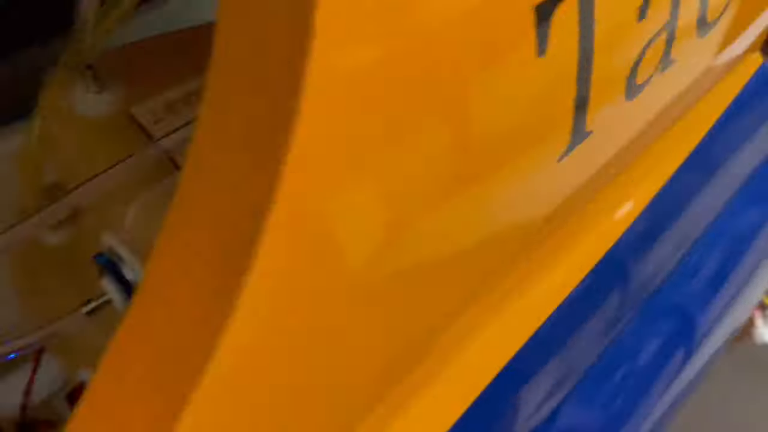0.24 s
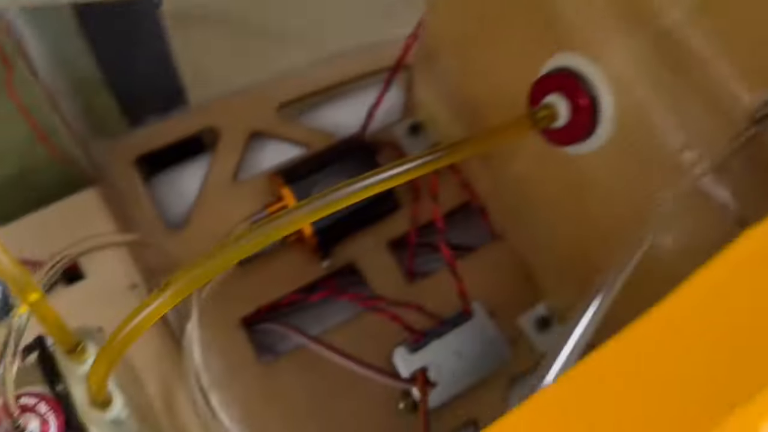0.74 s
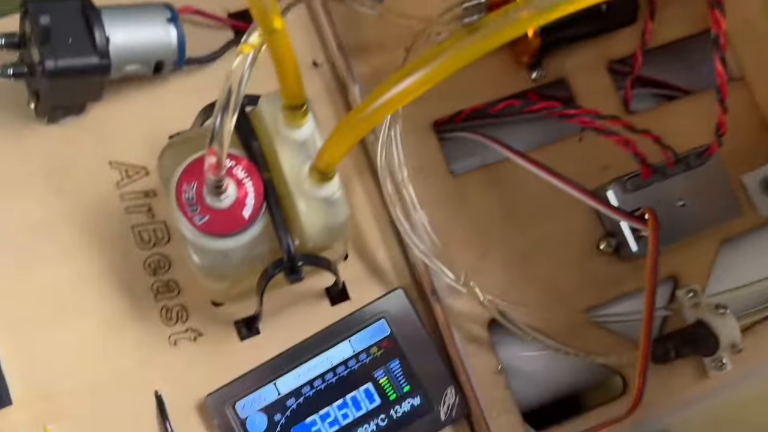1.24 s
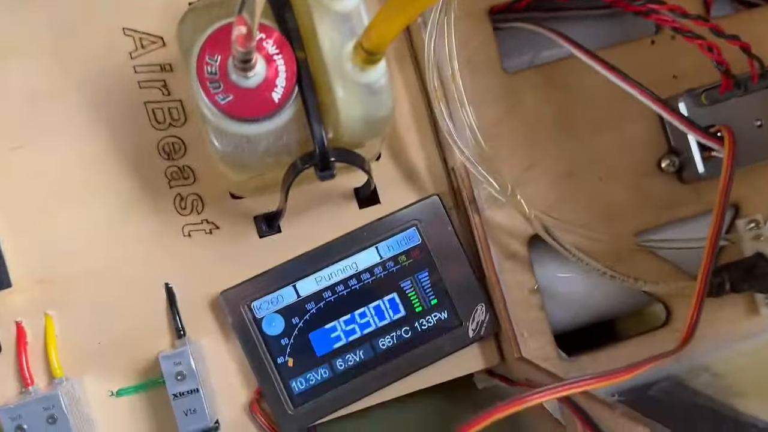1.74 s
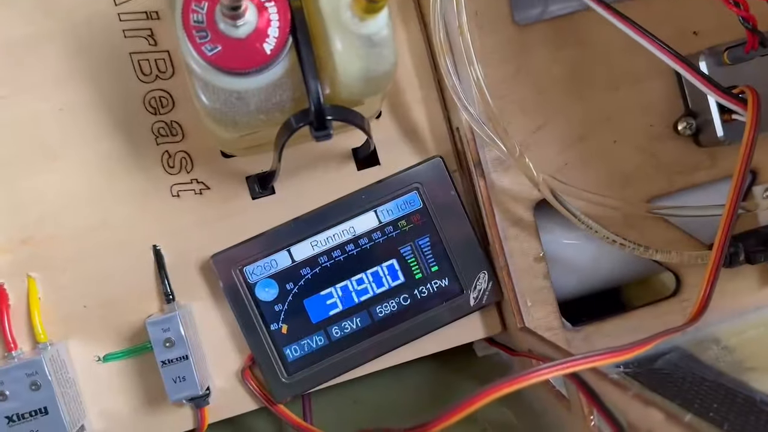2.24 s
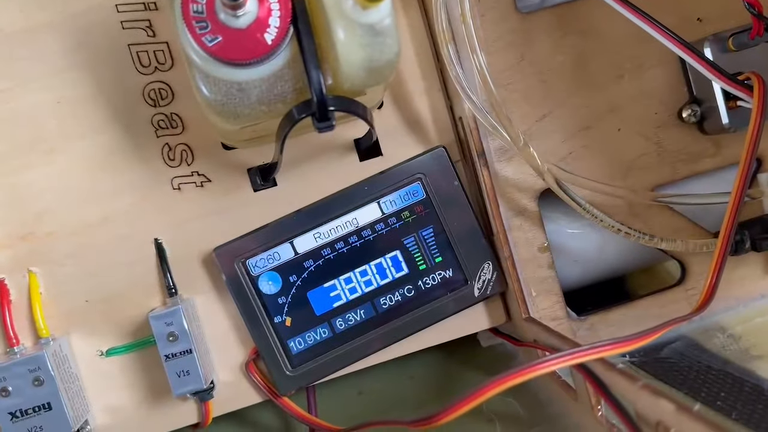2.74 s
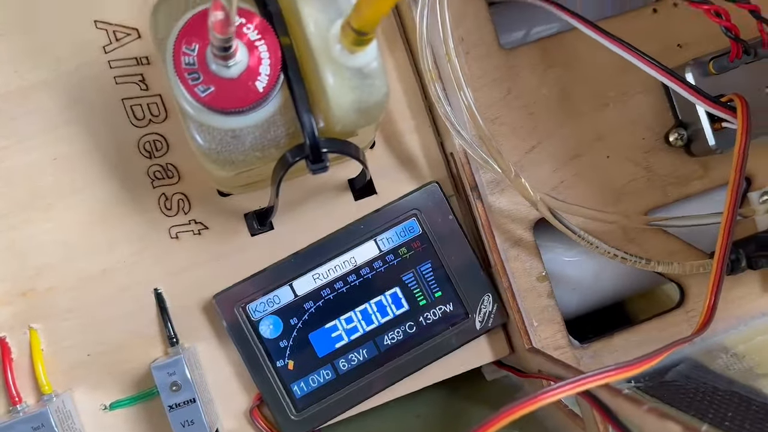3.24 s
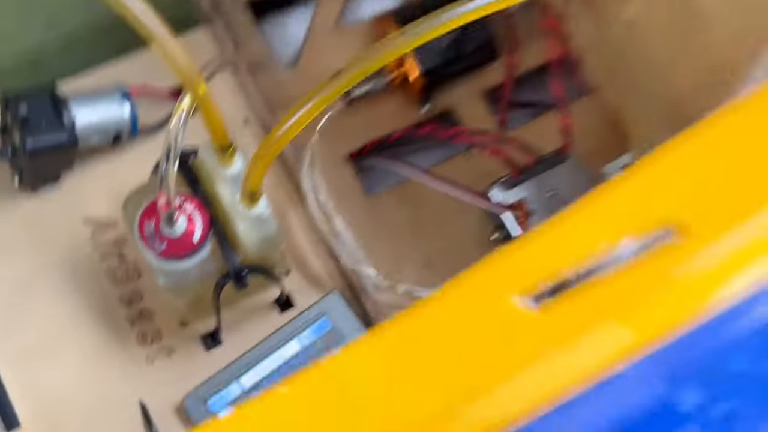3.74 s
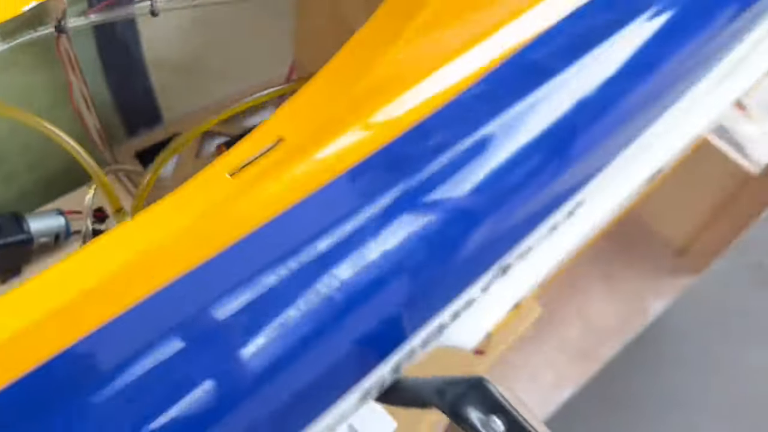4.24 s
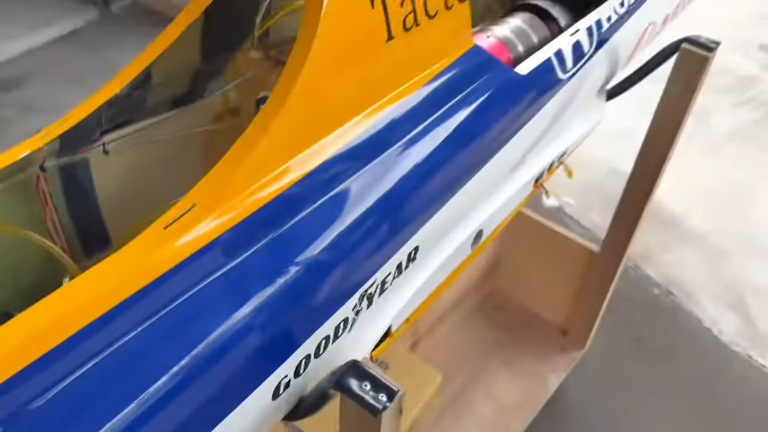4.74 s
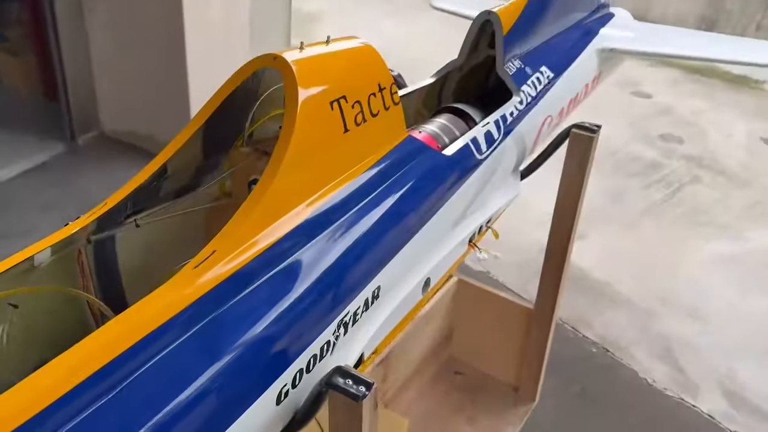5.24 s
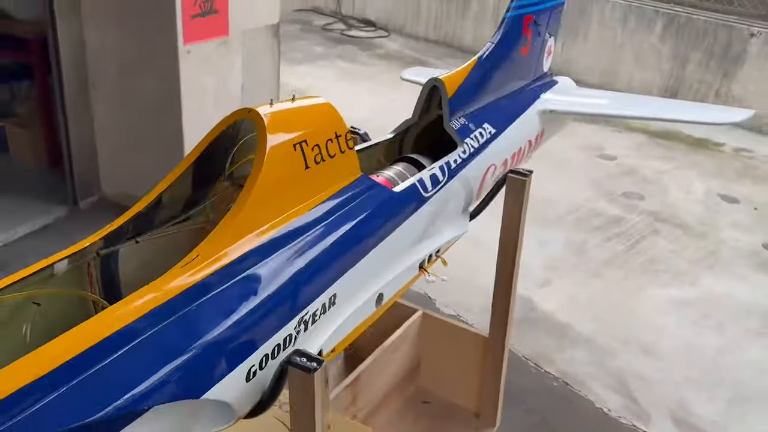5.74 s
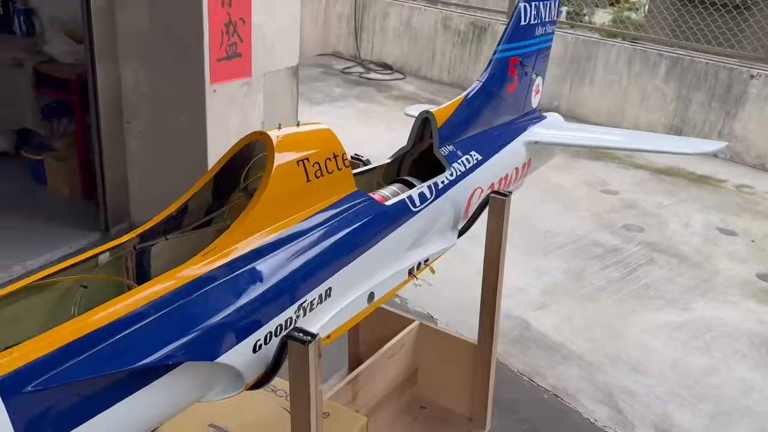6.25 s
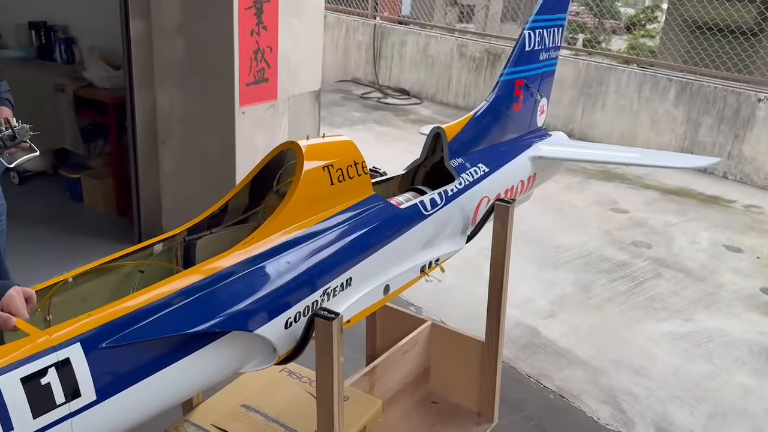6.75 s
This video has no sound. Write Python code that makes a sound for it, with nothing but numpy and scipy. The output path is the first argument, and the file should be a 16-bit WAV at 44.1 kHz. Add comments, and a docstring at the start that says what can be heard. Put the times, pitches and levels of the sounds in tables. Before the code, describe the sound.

Very high compressor whine climbs and levels off above jet hiss and rumble, wavering, with soft thumps, then fades as the listener backs away.

```python
"""Small jet turbine spooling up

A small jet turbine in a model aircraft spools up and settles at idle, heard by a hand-held phone that backs away.
The compressor (7 full, 7 splitter blades) whines on multiples of shaft speed, nicked by a sliding echo.
Filtered noise makes the jet, intake hiss, blade fizz, combustion roar and wash buffeting the ports;
decaying sines make low thumps, and a faint whistle, mostly falling, comes through in spells."""
import sys
import numpy as np
from scipy import signal
from scipy.fft import rfft, irfft, next_fast_len
from scipy.io import wavfile
from scipy.ndimage import uniform_filter1d, map_coordinates

SR = 44100
rng = np.random.default_rng(int(sys.argv[2]) if len(sys.argv) > 2 else 0)


def wav_out(sig):
    """Save sig, one row per channel (or a flat mono array), as 16-bit PCM at SR to the path in sys.argv[1]."""
    wavfile.write(sys.argv[1], SR, np.round(np.clip(np.atleast_2d(sig).T, -1, 1) * 32767).astype(np.int16))


N = 307818
TOP_HZ = 15900  # band limit of the phone

# Phone position: time_s, place (0 by the engine, 1 leaning over, 2 in the open bay,
# 3 over the rim, 4 beside the fuselage, 5 a step back)
PLACE = [(0, 0), (.32, 0), (.42, 1), (1.08, 1), (1.2, 2), (3.75, 2), (3.85, 3), (4.2, 3), (4.3, 4),
         (4.9, 4), (5.65, 4.3), (6.0, 5), (7, 5)]
# The two microphone ports: freq_hz, likeness (0-1), left_lead_rad
PORTS = [(100, .85, .1), (300, .96, -.2), (600, .68, -1), (1000, .4, -1), (1500, .58, -.9), (2200, .65, .1),
         (3100, .52, .8), (4500, .35, .8), (6000, .4, 0), (6800, .4, 1.3), (7500, .75, 2.9),
         (8200, .98, 3.1), (11000, .97, 3.1), (11800, .6, 2.3), (12500, .5, 1.9), (14000, .52, 1.2),
         (15300, .7, .5)]


def amp(db):
    """dB to gain."""
    return 10 ** (np.asarray(db) / 20)


def unit(x):
    """Scaled to rms 1."""
    return x / np.sqrt(np.mean(x ** 2) + 1e-20)


def along(freq_hz, values, hz):
    """Values given at freq_hz, interpolated at hz on a log axis."""
    return np.interp(np.log(hz + 1), np.log(np.asarray(freq_hz) + 1), values)


def track(time_s, values):
    """Breakpoints to one value per sample."""
    return np.interp(np.arange(N) / SR, time_s, values)


def wobble(knots_per_s):
    """Smooth random curve through normally distributed knots."""
    knots = rng.standard_normal(int(N * knots_per_s / SR) + 4)
    return map_coordinates(knots, [np.arange(N) * knots_per_s / SR])


def filtered(x, response):
    """x times a complex response of frequency."""
    size = next_fast_len(N + SR // 2)
    spectrum = rfft(x, size) * response(np.fft.rfftfreq(size, 1 / SR))
    return irfft(spectrum, size)[..., :N]


def shaped(points):
    """Gain function of a (freq_hz, density_db) spectrum."""
    return lambda hz: amp(along(*np.transpose(points), hz))


def hollow(modes):
    """Gain function of resonances (centre, width, dB), each applied twice for steep skirts."""
    def gain(f):
        power = 0
        for centre, width, db in modes:
            resonance = f * width / (centre * centre - f * f + 1j * f * width)
            power = power + amp(2 * db) * np.abs(resonance) ** 4
        return np.sqrt(power)
    return gain


def rush(gain, patchy_db):
    """Noise of rms 1 at two partly alike ports, with long, narrow time-frequency patches of random gain."""
    grid = signal.stft(rng.standard_normal((2, N)), nperseg=512)[2]
    field = uniform_filter1d(rng.standard_normal(grid.shape[1:]), size=2, axis=0)
    field = uniform_filter1d(field, size=30, axis=1)
    pair = signal.istft(grid * amp(patchy_db * unit(field)), nperseg=512)[1][:, :N]
    freq_hz, likeness, lead_rad = np.transpose(PORTS)

    def mix(hz):
        angle = np.arccos(np.clip(along(freq_hz, likeness, hz), 0, 1)) / 2
        return gain(hz) * [np.cos(angle), np.sin(angle)]

    def shift(hz):
        return np.exp(.5j * np.outer([1, -1], along(freq_hz, lead_rad, hz)))

    same, apart = filtered(pair, mix)
    return unit(filtered(np.array([same + apart, same - apart]), shift))


def tone(hz, gain, flicker_db, lead_rad=None):
    """Sine of rms gain at both ports, its level and phase flickering at random."""
    if lead_rad is None:
        lead_rad = along(*np.transpose(PORTS)[::2], hz)
    flicker = flicker_db * (wobble(60) + .8 * np.array([wobble(70), wobble(70)]))
    tremble_rad = 0.11 * flicker_db * (wobble(65) + np.array([wobble(55), wobble(50)]))
    phase = 2 * np.pi * np.cumsum(hz) / SR + [[.5], [-.5]] * lead_rad + tremble_rad
    return np.sqrt(2) * amp(flicker) * np.imag(gain * np.exp(1j * phase))


def scattered(share):
    """Complex gain at both ports of direct sound plus many weak, slowly rearranging reflections."""
    per_s = 9
    shared = wobble(per_s) + 1j * wobble(per_s)
    own = np.array([wobble(per_s) + 1j * wobble(per_s) for port in range(2)])
    return (1 + share * (shared + .5 * own)) / np.sqrt(1 + 2 * share ** 2)


def thumps():
    """Air thumps on the ports: short swells of a sine that sags in pitch."""
    # onset_s (swell starts 5 ms earlier), peak_db, start_hz, phase_sag_per_s, rise_s
    thump_list = [(1.641, -17.5, 225, 3, 0.0074), (1.662, -21, 297, 0.5, 0.01),
                  (1.724, -24, 229, 3.3, .006), (2.0, -17.5, 235, 9.7, .007),
                  (2.016, -25, 100, 8.6, 0.0091), (2.3, -22.5, 188, 4.5, 0.0064),
                  (2.785, -31.5, 374, .3, 0.014), (2.922, -29.5, 284, 0.3, 0.025),
                  (3.19, -30, 392, .3, .016), (3.595, -30, 220, 15, 0.0065), (4.32, -34, 190, 1, 0.021),
                  (5.934, -37, 95, 6, 0.0062)]
    out, t = np.zeros(N + SR), np.arange(SR // 5) / SR
    for onset_s, peak_db, start_hz, sag_per_s, rise_s in thump_list:
        swell = (t / rise_s) ** 2 * np.exp(2 - 2 * t / rise_s)
        cycles = start_hz * t / (1 + sag_per_s * t)
        first = round((onset_s - .005) * SR)
        out[first:][:len(t)] += amp(peak_db) * swell * np.sin(2 * np.pi * cycles)
    return out[:N]


def roar():
    """Combustion noise rung by fuselage hollows, coloured by place, over lumpy low-frequency wash buffeting."""
    # combustion roar before gust lift: time_s, level_db
    roar_level = [(0, -26.5), (0.68, -28.5), (1.3, -30.5), (1.5, -31), (1.65, -28), (1.77, -30),
                  (1.83, -34), (1.95, -32.5), (2.35, -31.5), (2.5, -34), (2.8, -34), (2.84, -43.5),
                  (3.05, -42.5), (3.18, -38), (3.3, -34.5), (3.55, -36.5), (3.73, -37), (3.79, -44.5),
                  (4.0, -45), (4.06, -40.5), (4.33, -40.5), (4.58, -39.5), (4.7, -41), (5.25, -41.5),
                  (5.5, -42.5), (6.5, -41.5), (6.99, -40.5)]
    # steady buffeting: time_s, level_db
    wash_level = [(0, -42), (.5, -42), (.8, -42), (1.2, -47), (1.9, -46.5), (2.4, -48), (2.8, -55),
                  (3.0, -59), (3.87, -59), (3.94, -72), (4.1, -60), (5.0, -63), (6.1, -60), (7, -64)]
    # gusts of exhaust wash: centre_s, peak_db, length_s
    gusts = [(0.657, -41, 0.16), (1.145, -42.5, 0.37), (1.4, -36, 0.062), (1.614, -37, 0.17),
             (2.022, -32, 0.051), (2.32, -40.5, 0.12), (2.685, -51.5, 0.21), (2.95, -50, 0.037),
             (3.39, -54, 0.058), (3.65, -51, 0.07), (3.868, -55, 0.056), (2.6, -56, 0.48), (5.8, -62, 0.4),
             (5.96, -53, .08), (6.39, -56, 0.047), (6.585, -58, 0.05), (6.912, -61, 0.052)]
    # buffeting spectrum: freq_hz, relative density_db
    buffet_spectrum = [(15, -34), (30, -15), (60, -4.5), (100, -0.5), (140, -2.5), (250, -35.5)]
    # fuselage hollows: centre_hz, width_hz of one pass, relative level_db at places 0 to 5
    hollows = [(176, 75, -5.5, -7, -1, -1, -1, -4), (217, 74, -0.5, 0.5, -7.5, -7.5, -13, -0.5),
               (290.5, 78, -15, -10.5, 2, 1, 1, -2), (388, 97, -13, -8, -3.5, -10, -17, -2),
               (452, 70, -8.5, -14, -18, -10.5, -8, 1.5), (494.5, 67, -2, -8.5, -10, -15, -9.5, -12),
               (615, 168, -5.5, -16, -8.5, -12.5, -14, -9), (723, 187, -18, -13, -14.5, -14, -9.5, -9.5),
               (867, 71, -11.5, -12, -17.5, -4, -1, -4.5), (1097, 82, -16.5, -15.5, -20.5, -7, -14.5, -15),
               (1327, 45, -24, -28, -17.5, -19, -9, -9.5), (1843, 97, -17, -19, -15, -11, -18, -10.5),
               (3017, 160, -28, -25, -15.5, -6, -19.5, -18.5)]
    roar_db_per_gust_db = 0.076  # gust dB over the steady buffeting

    t = np.arange(N) / SR
    steady = amp(track(*np.transpose(wash_level)))
    buffet = steady.copy()
    for centre_s, peak_db, length_s in gusts:
        buffet += amp(peak_db) * np.exp(-2 * ((t - centre_s) / length_s) ** 2)

    place = track(*np.transpose(PLACE))
    centre_hz, width_hz, *levels_db = np.transpose(hollows)
    body = 0
    for k, level_db in enumerate(levels_db):
        nearness = np.sqrt(np.clip(1 - abs(place - k), 0, 1))
        modes = list(zip(centre_hz, width_hz, level_db))
        body = body + nearness * rush(hollow(modes), patchy_db=0.2)
    body = body * amp([[.8], [-.8]] + 1.02 * wobble(14)) * (buffet / steady) ** roar_db_per_gust_db
    lumps = amp(0.97 * wobble(10)) * rush(shaped(buffet_spectrum), patchy_db=3.0)
    return amp(track(*np.transpose(roar_level))) * body + buffet * unit(lumps)


def airflow():
    """Jet, intake hiss and blade fizz as shaped noise; the jet crossfades to a duller one outside the bay."""
    # time_s, jet_db, hiss_db, fizz_db
    air_levels = [(0.0, -31.5, -38, -46), (0.6, -30.5, -27.5, -35), (1.55, -31, -25.5, -31.5),
                  (1.8, -34.5, -32, -35), (2.16, -35.5, -32.5, -36), (2.26, -35.5, -35, -38),
                  (2.36, -35.5, -47, -50), (2.9, -36.5, -45, -48), (3.02, -36, -35.5, -39),
                  (3.57, -38.5, -36.5, -38), (3.66, -38.5, -40, -47), (3.84, -39.5, -41, -48),
                  (3.92, -40, -38, -36.5), (4.4, -44.5, -46, -41.5), (5.39, -45.5, -45.5, -46.5),
                  (6.13, -45.5, -48, -47), (6.99, -46, -50, -48)]
    # spectra: freq_hz, relative density_db
    near_jet_spectrum = [(500, -32), (950, -10.5), (1300, -4), (1900, -8), (2400, -8.5), (3000, -7.5),
                         (3400, -5), (4200, -1.5), (5500, -1.5), (6500, 0.5), (8000, -13)]
    far_jet_spectrum = [(500, -53), (1000, -1.5), (1230, -4), (1600, -2.5), (2050, -3.5), (2400, -5),
                        (3000, -4.5), (3400, -6), (4400, -6), (5500, -4.5), (6500, -6.5), (8000, -24)]
    hiss_spectrum = [(4500, -40), (5800, -7), (7000, -3), (8500, 0), (10000, -3), (11700, -7), (13500, -40)]
    fizz_spectrum = [(10500, -65), (11800, 0), (13000, 12.5), (14500, 4), (15700, 4.5)]

    time_s, jet_db, hiss_db, fizz_db = np.transpose(air_levels)
    outside = np.clip(track(*np.transpose(PLACE)) / 4, 0, 1)
    near = np.sqrt(1 - outside) * rush(shaped(near_jet_spectrum), patchy_db=3.5)
    far = np.sqrt(outside) * rush(shaped(far_jet_spectrum), patchy_db=1.8)
    jet = (near + far) * amp(track(time_s, jet_db) + .4 * wobble(6) + [[-.4], [.4]])
    hiss = amp(track(time_s, hiss_db) + wobble(8)) * rush(shaped(hiss_spectrum), patchy_db=1.5)
    fizz = amp(track(time_s, fizz_db) + wobble(9)) * rush(shaped(fizz_spectrum), patchy_db=2)
    return jet + hiss + fizz


def whistle():
    """Thin, mostly falling tone in spells, probably the starter motor coasting."""
    # time_s, pitch_hz
    pitch = [(2.15, 3080), (2.24, 2960), (2.434, 2694), (2.65, 2523), (3.0, 2398), (3.32, 2305),
             (3.69, 2204), (3.78, 2180), (3.9, 2222)]
    # spells in which it comes through: start_s, end_s, level_db
    spells = [(2.2, 2.26, -51), (2.3, 2.93, -45.5), (2.96, 3.05, -51), (3.3, 3.37, -52), (3.645, 3.69, -45),
              (3.785, 3.85, -48.5)]
    edge_db_per_s = 500
    t = np.arange(N) / SR
    gain = 0
    for start_s, end_s, level_db in spells:
        outside_s = np.maximum(0, np.maximum(start_s - t, t - end_s))
        gain = gain + amp(level_db - edge_db_per_s * outside_s)
    return tone(track(*np.transpose(pitch)), gain * amp([[1.2], [-1.2]]), flicker_db=1.8)


def sliding_echo():
    """Echo lag (cycles of the whine) and strength, sliding as pitch and phone move."""
    # time_s, lag_cycles, strength (0-1)
    echo_points = [(0.0, 0.0, 0.0), (0.036, 0.5, 0.48), (0.086, 1.5, 0.97), (0.167, 2.5, 0.02),
                   (0.244, 3.5, 0.42), (0.344, 4.5, 0.34), (0.393, 5.5, 0.41), (0.478, 6.5, 0.51),
                   (0.562, 7.5, 0.25), (0.649, 8.5, 0.85), (0.761, 9.5, 0.19), (0.856, 10.5, 0.51),
                   (1.021, 11.5, 0.0), (1.161, 12.5, 0.82), (1.204, 13.5, 0.54), (1.303, 14.5, 0.72),
                   (1.438, 15.5, 0.53), (1.499, 16.5, 0.33), (1.598, 17.5, 0.53), (1.774, 18.5, 0.37),
                   (1.952, 19.5, 0.24), (2.013, 20.5, 0.26), (2.203, 21.5, 0.13), (2.263, 21.95, 0.23),
                   (3.398, 22.05, 0.97), (3.462, 22.5, 0.85), (3.569, 23.5, 0.26), (3.639, 23.95, 0.15),
                   (3.879, 24.05, 0.66), (3.944, 24.5, 0.58), (4.119, 25.5, 0.01), (4.173, 26.5, 0.4),
                   (4.213, 27.5, 0.72), (4.303, 28.5, 0.24), (4.363, 28.95, 0.97), (4.662, 29.05, 0.82),
                   (4.734, 29.5, 0.48), (4.804, 29.95, 0.97), (4.923, 30.05, 0.0), (4.996, 30.5, 0.56),
                   (5.125, 31.5, 0.34), (5.275, 32.5, 0.03), (5.437, 33.5, 0.28), (5.577, 34.5, 0.78),
                   (5.732, 35.5, 0.48), (5.775, 35.95, 0.72), (5.901, 36.05, 0.0), (5.952, 36.5, 0.69),
                   (5.997, 37.5, 0.55), (6.098, 38.5, 0.23), (6.199, 39.5, 0.37), (6.244, 39.95, 0.0),
                   (6.328, 40.05, 0.97), (6.395, 40.5, 0.44), (6.518, 41.5, 0.8), (6.631, 42.5, 0.4),
                   (6.699, 43.5, 0.3), (6.828, 44.5, 0.29), (6.98, 45.0, 0.0)]
    time_s, lag_cycles, strength = np.transpose(echo_points)
    return track(time_s, lag_cycles), track(time_s, strength)


def whine(shaft_hz, lag_cycles, strength, moving):
    """Passing tone of all 14 blades, cancelled by the echo near half-cycle lags, plus haze and neighbours."""
    # crests of the tone: time_s, left_db, right_db, left_lead_rad, left_extra_lag_cycles (echo)
    crests = [(0.0, -26.7, -15.9, 6.41, -0.06), (0.122, -24.8, -22.9, 1.07, 0.05),
              (0.2, -17.7, -16.8, 0.47, -0.09), (0.294, -17.3, -18.7, 0.31, 0.14),
              (0.372, -18.2, -29.3, -0.57, -0.1), (0.437, -18.3, -17.8, -2.11, -0.15),
              (0.519, -20.6, -13.6, 0.71, -0.15), (0.609, -17.9, -12.9, 1.96, 0.13),
              (0.713, -14.2, -12.9, 1.21, -0.04), (0.821, -22.9, -23.4, 1.69, -0.02),
              (0.95, -15.5, -43.3, 3.4, -0.15), (1.095, -19.3, -13.5, 3.0, -0.12),
              (1.18, -19.1, -21.6, 3.91, 0.15), (1.252, -12.9, -21.7, 3.98, 0.15),
              (1.367, -10.3, -11.4, 3.01, -0.15), (1.464, -14.9, -15.0, 3.36, 0.1),
              (1.549, -11.9, -12.6, 3.33, 0.08), (1.691, -10.9, -12.3, 3.15, 0.01),
              (1.863, -17.4, -16.0, 2.69, -0.11), (1.983, -11.0, -16.0, 2.87, 0.04),
              (2.118, -12.2, -16.5, 2.85, 0.08), (2.245, -11.2, -15.8, 2.46, 0.01),
              (2.375, -11.8, -13.8, 2.59, 0.08), (2.625, -12.2, -13.2, 2.52, -0.08),
              (2.839, -12.6, -15.2, 2.71, -0.02), (3.125, -13.9, -17.9, 2.79, 0.0),
              (3.375, -14.9, -19.7, 2.43, -0.02), (3.432, -14.1, -13.9, 2.38, -0.09),
              (3.515, -16.9, -20.6, 2.5, 0.03), (3.597, -13.8, -16.0, 2.83, -0.08),
              (3.759, -13.9, -14.5, 2.82, 0.01), (3.921, -16.4, -19.5, 2.69, 0.04),
              (4.041, -15.8, -16.2, 2.7, 0.15), (4.151, -34.7, -29.7, 2.17, -0.15),
              (4.265, -21.1, -22.1, 2.63, 0.15), (4.345, -24.1, -21.2, 2.74, 0.15),
              (4.525, -22.1, -24.0, 3.05, -0.03), (4.704, -24.3, -30.0, 2.42, 0.09),
              (4.764, -28.9, -36.8, 1.78, -0.01), (4.859, -26.7, -26.2, 2.0, -0.15),
              (4.954, -33.1, -31.5, 2.91, -0.12), (5.049, -30.1, -26.3, 2.46, 0.07),
              (5.188, -29.4, -29.7, 1.61, -0.15), (5.345, -28.1, -25.1, 2.91, 0.14),
              (5.505, -24.2, -26.8, 2.79, -0.01), (5.655, -22.6, -27.5, 2.55, -0.11),
              (5.757, -24.6, -29.2, 2.66, 0.01), (5.839, -29.3, -33.0, 3.15, 0.02),
              (5.921, -33.5, -35.7, 2.37, -0.03), (6.036, -36.5, -32.8, 2.58, 0.15),
              (6.141, -28.4, -29.4, 2.89, -0.11), (6.226, -38.7, -31.9, 3.36, -0.13),
              (6.298, -30.1, -29.8, 1.82, -0.11), (6.37, -22.9, -24.6, 3.08, -0.03),
              (6.46, -24.7, -25.5, 2.61, -0.03), (6.575, -23.9, -25.1, 2.62, -0.07),
              (6.665, -25.8, -29.0, 2.58, -0.02), (6.765, -23.4, -25.4, 2.46, 0.01),
              (6.905, -25.5, -27.3, 2.41, 0.02), (6.98, -24.7, -27.2, 2.77, 0.02)]
    # faint tones of unequal blades: shaft_order, level_db relative to the crests
    neighbours = [(12, -43), (15, -40)]
    haze_db, haze_per_s = -25.5, 250  # relative to crests, per quadrature

    time_s, left_db, right_db, lead_rad, skew_cycles = np.transpose(crests)
    crest = amp([track(time_s, left_db), track(time_s, right_db)])
    port_lag = lag_cycles + [[.5], [-.5]] * track(time_s, skew_cycles)
    echo = strength * np.exp(-2j * np.pi * port_lag)
    # a narrow band of faint noise surrounds the whine
    haze = amp(haze_db + 5.2 * wobble(12)) * (wobble(haze_per_s) + 1j * wobble(haze_per_s))
    gain = crest * ((1 + echo) / (1 + strength) * scattered(.03 * moving) + haze)
    out = tone(14 * shaft_hz, gain, flicker_db=.65, lead_rad=track(time_s, lead_rad))
    for order, level_db in neighbours:
        out += tone(order * shaft_hz, crest * amp(level_db) * scattered(.5), flicker_db=1.3)
    return out


def other_orders(shaft_hz, moving):
    """Compressor tones on shaft orders 7, 21 and 28 (second harmonic of the whine), muted above the band."""
    # each: time_s, level_db
    order_7 = [(0, -66), (.35, -62), (.54, -50), (.67, -57), (.8, -48), (.85, -60), (.9, -51), (1.0, -62),
               (1.03, -52), (1.11, -57), (1.22, -46), (1.38, -60), (1.55, -55), (1.62, -66), (1.76, -56),
               (1.79, -36), (1.85, -39), (1.88, -52), (1.91, -41), (2.03, -40), (2.045, -45), (2.07, -39),
               (2.12, -41), (2.2, -49), (2.23, -64), (2.43, -56), (2.48, -45), (2.64, -43), (2.675, -50),
               (2.71, -43), (3.1, -42), (3.16, -47), (3.22, -58), (3.6, -64), (3.66, -44), (3.74, -41),
               (3.78, -60), (3.83, -46), (3.94, -56), (3.98, -51), (4.11, -72), (4.2, -55), (4.37, -49),
               (4.44, -54), (4.47, -72), (4.52, -50), (4.57, -58), (4.63, -53), (4.69, -70), (4.73, -49),
               (4.79, -48), (4.83, -58), (4.88, -56), (4.93, -50), (5.0, -72), (5.04, -54), (5.08, -54),
               (5.12, -72), (5.2, -59), (5.4, -60), (5.44, -52), (5.55, -55), (5.58, -48), (5.62, -55),
               (5.8, -50), (5.84, -60), (5.88, -53), (6.0, -55), (6.13, -61), (6.3, -56), (6.4, -56),
               (6.64, -58), (6.7, -72), (6.8, -58), (6.92, -57), (6.98, -68)]
    order_21 = [(0, -56), (.13, -49), (.28, -64), (.5, -42), (.58, -55), (.75, -39), (.94, -62),
                (1.12, -60), (1.18, -41), (1.38, -58), (1.54, -36), (1.66, -43), (1.75, -33), (1.92, -50),
                (2.01, -41), (2.13, -50), (2.2, -44), (2.31, -57), (2.37, -50), (2.46, -64), (2.53, -48),
                (2.9, -45), (3.12, -39), (3.38, -43), (3.44, -60), (3.51, -43), (3.61, -54), (3.7, -47),
                (4.02, -46), (4.1, -62), (4.16, -50), (4.38, -51), (4.45, -64), (4.57, -55), (4.85, -57),
                (4.99, -48), (5.16, -47), (5.24, -62), (5.4, -48), (5.6, -53), (5.65, -62), (5.73, -52),
                (6.0, -55), (6.07, -44), (6.13, -60), (6.2, -48), (6.46, -47), (6.56, -56), (6.64, -47),
                (6.76, -47), (6.8, -60), (6.86, -50), (6.98, -52)]
    order_28 = [(0, -29), (.075, -33), (.105, -26), (.15, -33), (.17, -28), (.195, -29), (.215, -42),
                (.23, -35), (.25, -44), (.265, -31), (.34, -34), (.36, -26.5), (.395, -38), (.43, -25),
                (.47, -29), (.51, -25), (.585, -29), (.605, -38), (.62, -26.5), (.655, -19), (.71, -22),
                (.74, -33), (.755, -28), (.775, -34), (.845, -21), (.87, -35), (.91, -24), (.945, -28),
                (.96, -38), (.97, -30), (.985, -39), (1.025, -36), (1.04, -48), (1.085, -29), (1.1, -45),
                (1.122, -36), (1.17, -68)]
    out = 0
    for order, level in ((7, order_7), (21, order_21), (28, order_28)):
        in_band = order * shaft_hz < TOP_HZ
        gain = amp(track(*np.transpose(level))) * scattered(.08 * moving) * in_band
        out = out + tone(order * shaft_hz, gain, flicker_db=1.3)
    return out


def compressor():
    """All blade tones locked to one shaft speed, scattered more while the echo slides."""
    # time_s, shaft_hz
    shaft_speed = [(0.0, 415.5), (0.11, 427.4), (0.63, 492.1), (1.09, 552.2), (1.27, 574.5), (1.38, 586.5),
                   (1.57, 603.7), (1.83, 624.3), (1.92, 630.3), (2.15, 641.1), (2.35, 645.9), (2.52, 648.5),
                   (2.87, 651.1), (3.75, 654.5), (4.75, 654.1), (5.31, 657.2), (6.22, 658.0), (6.98, 661.3)]
    full_scatter_cycles_per_s = 3.6  # echo slide at which the moving phone scatters tones fully
    shaft_hz = track(*np.transpose(shaft_speed)) + .12 * wobble(12)
    lag_cycles, strength = sliding_echo()
    slide_cycles_per_s = np.gradient(lag_cycles) * SR
    moving = uniform_filter1d(np.clip(slide_cycles_per_s / full_scatter_cycles_per_s, 0, 1), size=4000)
    return whine(shaft_hz, lag_cycles, strength, moving) + other_orders(shaft_hz, moving)


def scene():
    """Everything at the two ports."""
    return thumps() + roar() + airflow() + whistle() + compressor()


def record(dry):
    """The phone keeps nothing above its band limit."""
    return filtered(dry, lambda hz: hz < TOP_HZ)


dry = scene()
out = record(dry)
wav_out(out)
```